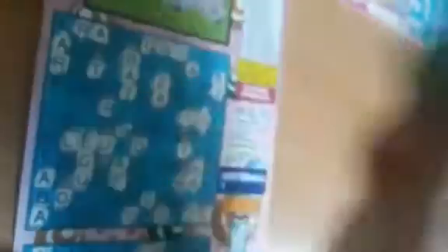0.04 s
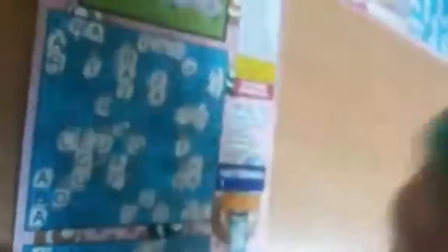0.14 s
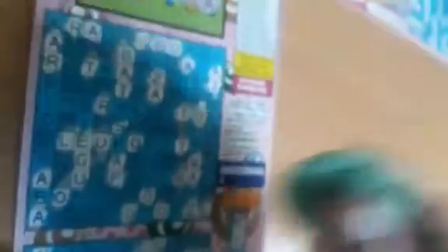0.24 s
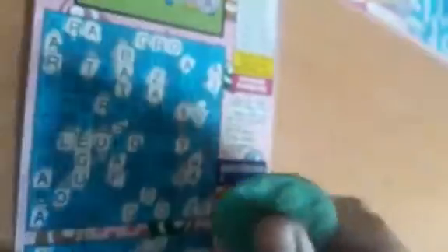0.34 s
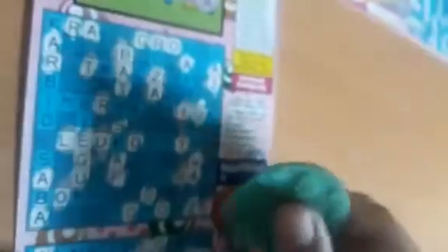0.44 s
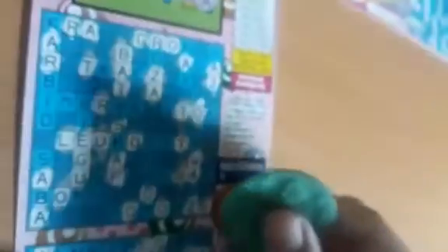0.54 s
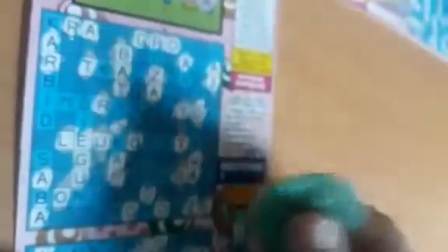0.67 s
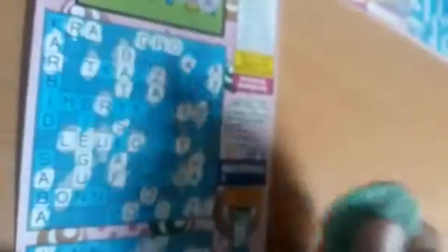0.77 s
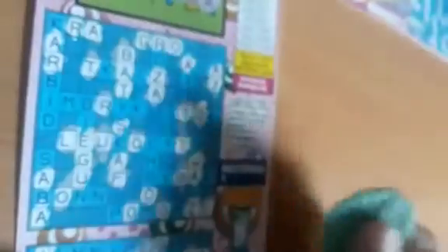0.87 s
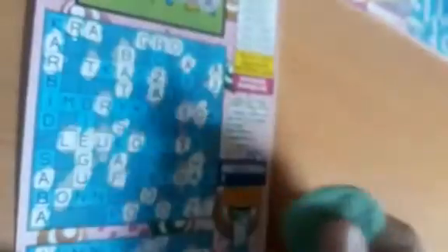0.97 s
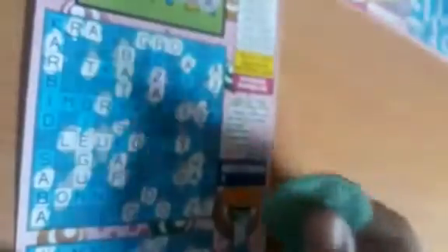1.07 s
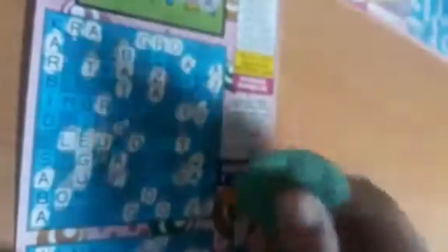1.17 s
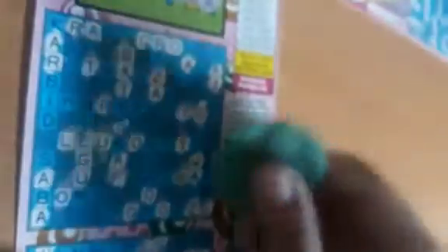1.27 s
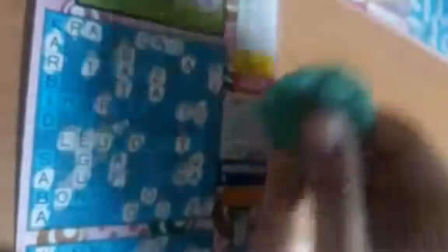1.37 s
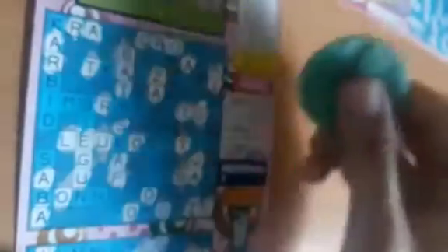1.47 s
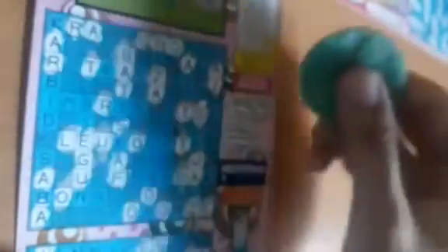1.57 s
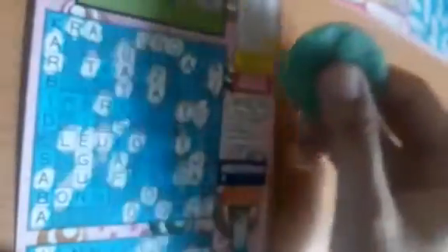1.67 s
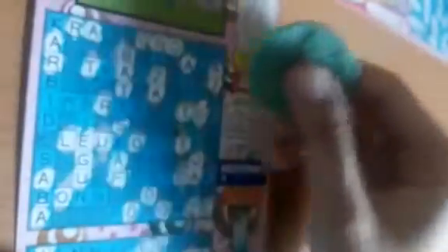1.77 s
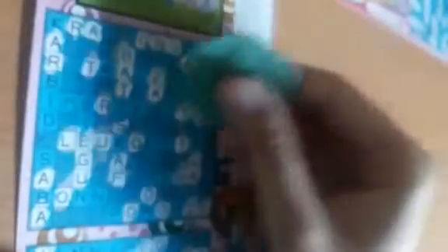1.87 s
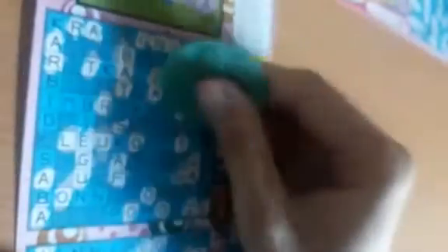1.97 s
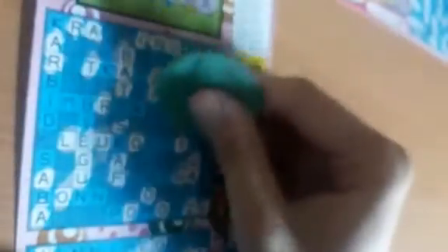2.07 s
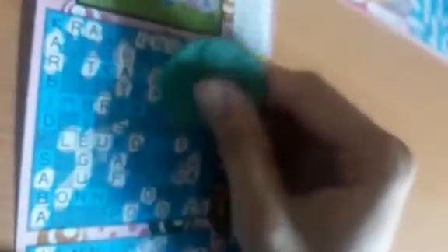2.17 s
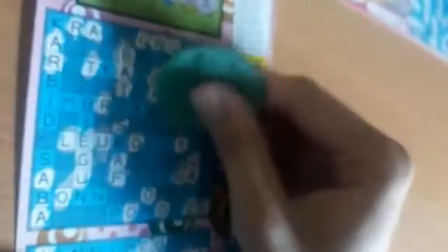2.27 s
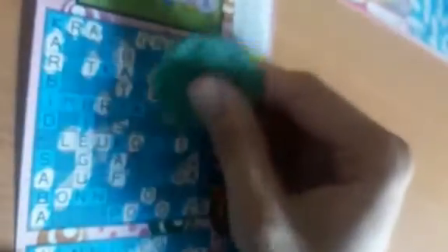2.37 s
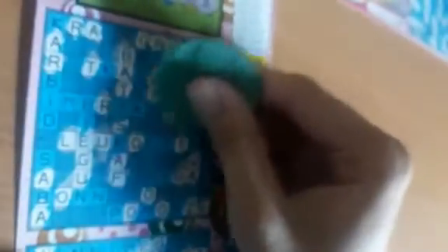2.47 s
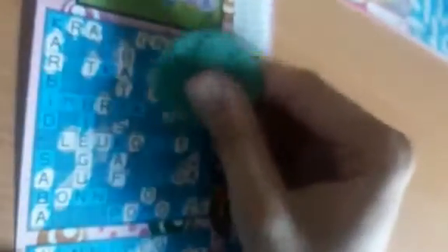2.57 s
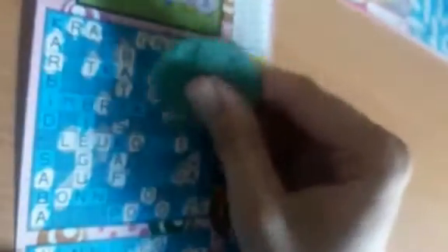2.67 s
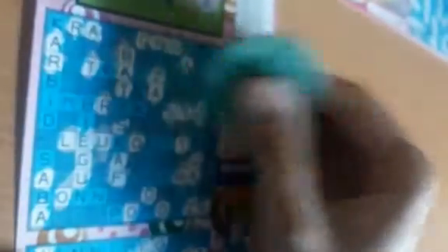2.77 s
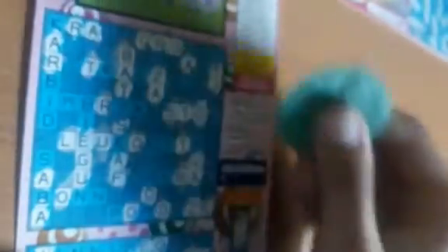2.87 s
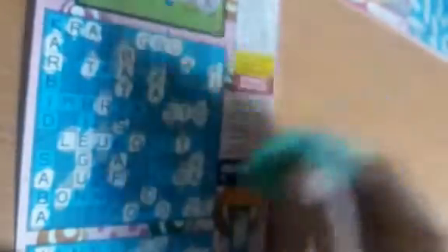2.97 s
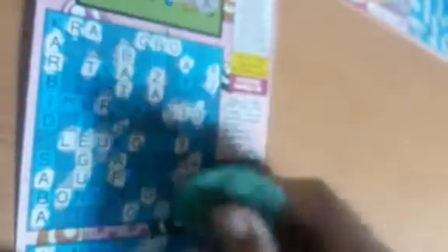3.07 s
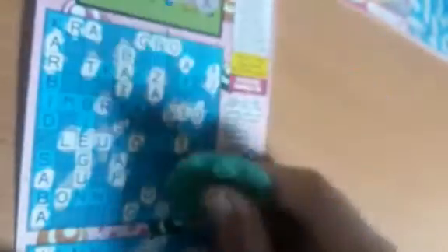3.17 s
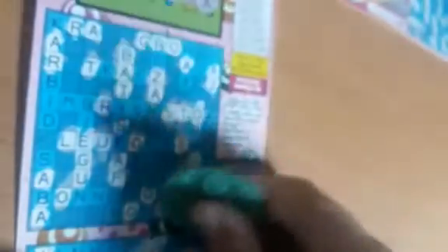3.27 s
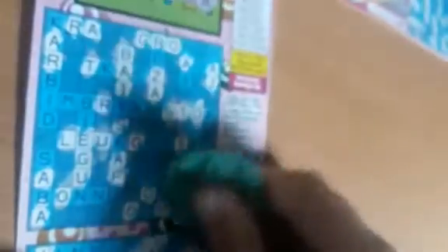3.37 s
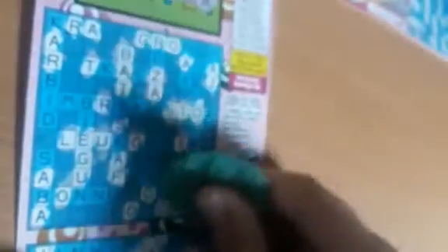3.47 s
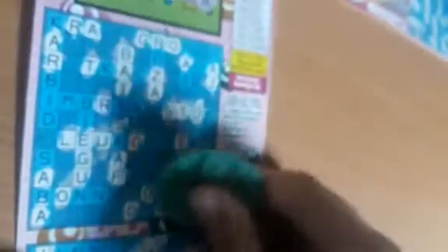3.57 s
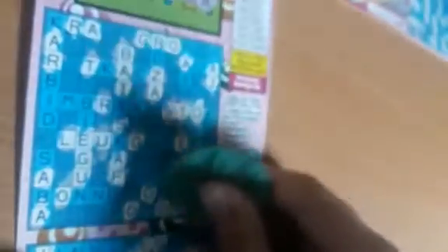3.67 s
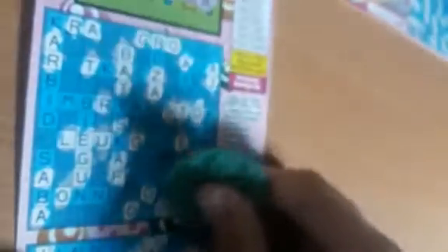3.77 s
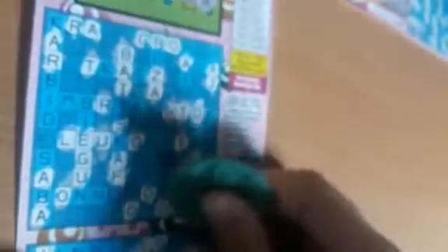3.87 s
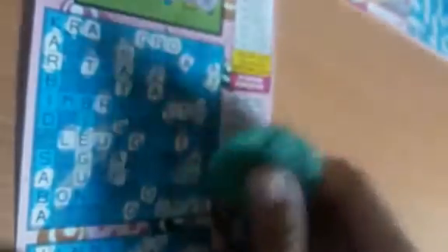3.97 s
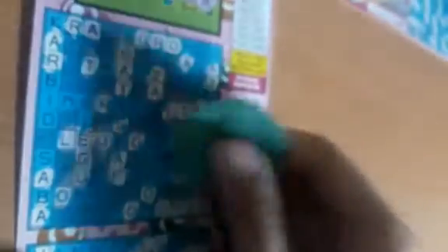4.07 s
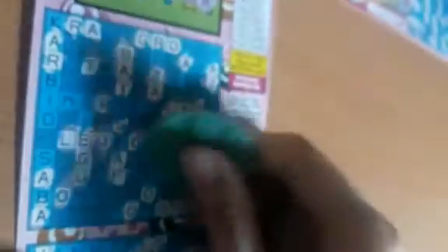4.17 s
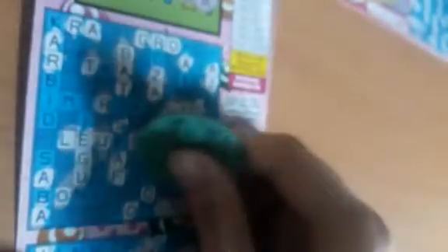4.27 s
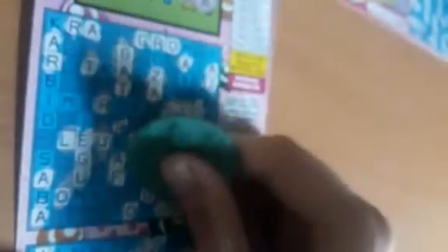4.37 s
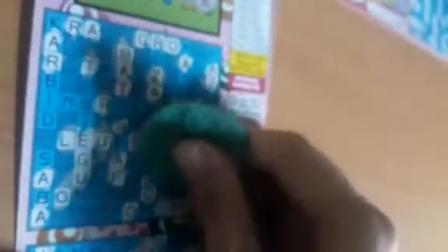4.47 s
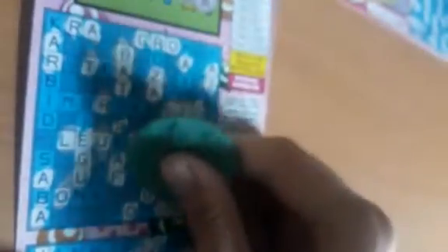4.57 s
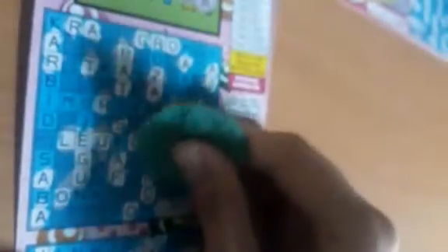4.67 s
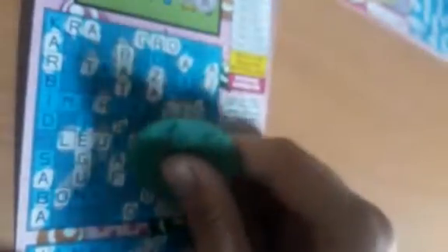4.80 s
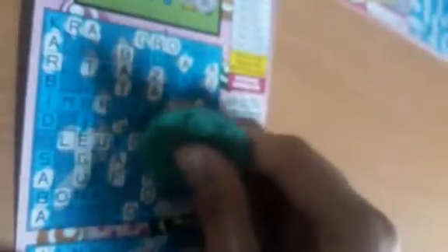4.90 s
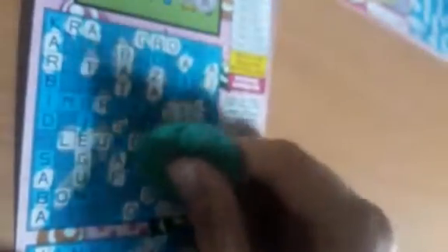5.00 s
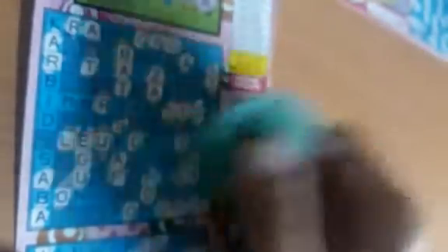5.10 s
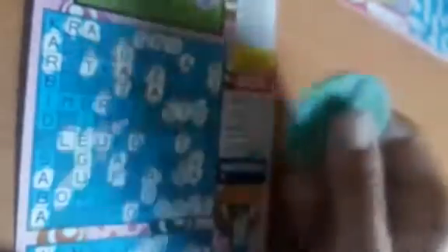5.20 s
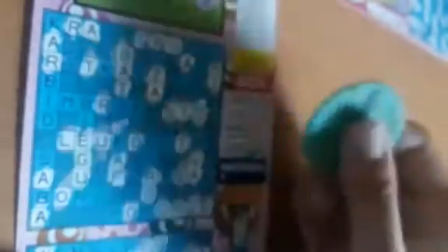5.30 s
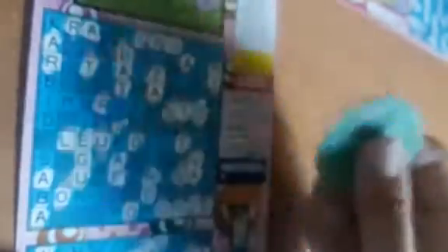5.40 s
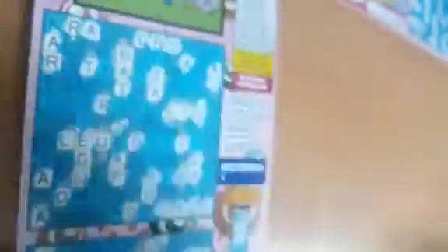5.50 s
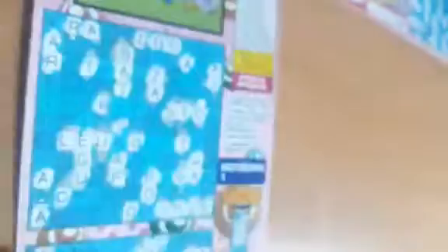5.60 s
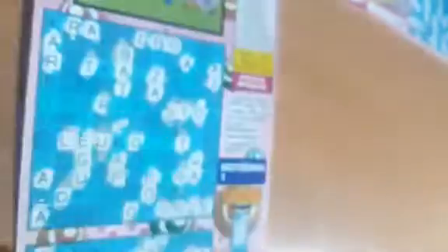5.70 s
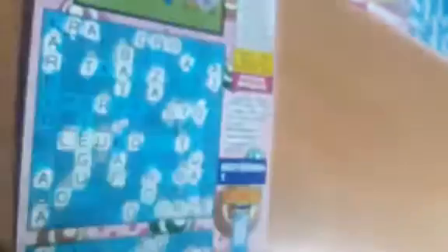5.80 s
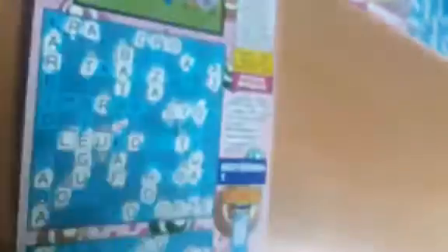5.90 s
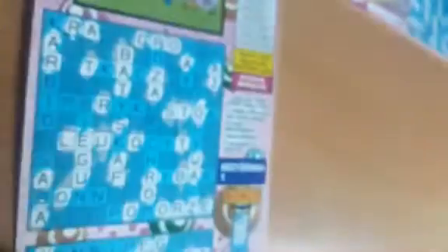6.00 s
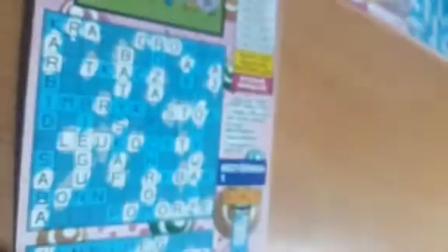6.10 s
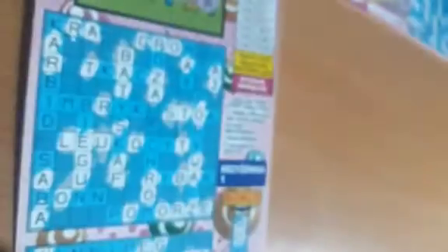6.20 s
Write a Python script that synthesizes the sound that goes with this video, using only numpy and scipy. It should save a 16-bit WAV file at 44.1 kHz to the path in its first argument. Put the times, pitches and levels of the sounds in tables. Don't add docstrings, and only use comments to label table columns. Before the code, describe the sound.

In a quiet room, close to the microphone, fingers shift softly on paper and a plastic scraper gives small sharp ticks. After two seconds it taps down and rubs a card on a wooden table with seven quick push-and-pull strokes. A pause with faint brushing, then two more bouts begin with firmer knocks, the tabletop thudding beneath the scratchy rasp. Finally the scraper lifts with a tiny dusty flick, and a few faint ticks end it.

```python
import sys
import numpy as np
from scipy import signal
from scipy.fft import rfft, irfft, next_fast_len
from scipy.io import wavfile
from scipy.ndimage import uniform_filter1d, map_coordinates

SR = 44100
rng = np.random.default_rng(int(sys.argv[2]) if len(sys.argv) > 2 else 0)


def gain_from_db(level_db):
    decades = np.asarray(level_db, float) / 20
    return 10 ** decades


def dump(signal):
    limited = np.clip(np.atleast_2d(signal).T, -1, 1)
    pcm = np.round(limited * 32767).astype(np.int16)
    wavfile.write(sys.argv[1], SR, pcm)


N = 275614
TIME = np.arange(N) / SR
SLOW = TIME[::16]

# [f/Hz, level/dB per Hz]
AIR_SPECTRUM = [(120, -27), (200, -6), (340, -10.5), (840, -9.5), (1600, -18), (4200, -18.5), (9500, -27),
                (14800, -19.5)]
# [f/Hz, level/dB per Hz]
TREMOR_SPECTRUM = [(15, -59), (25, -6), (41, -19), (59, -1.5), (177, -1), (210, -20), (270, -40),
                   (460, -120)]
# [middle t/s, length/s, level/dB]
LEANING = [
    (3.7, 2, 3.5),
    (2.3, 3.6, 1.5),
]
# [f/Hz, level/dB per Hz]
HISS_SPECTRUM = [(30, -8), (150, -16), (400, -20), (1500, -20.5), (5000, -13.5), (9000, -17.5),
                 (14000, -15), (15800, -18.5)]
# [f/Hz, t60/s]
ROOM_DECAY = [(200, 0.51), (2000, 0.24), (6000, 0.23), (12000, 0.51)]
# [t/s, peak level/dB, main f/Hz, second f/Hz]
TICKS = [(0, -41, 3990, 6160), (0, -43, 432, 800), (0, -51, 7230, 12000), (0.4897, -35, 5840, 5270),
         (.49, -46, 4280, 3820), (0.7468, -47.5, 6670, 4100), (0.7487, -60, 7700, 11700),
         (.9027, -44, 3790, 6350), (.9662, -46, 3500, 5850), (.968, -61, 2010, 1770),
         (.99, -61, 14300, 13700), (1.0816, -44.5, 6250, 14100), (1.081, -41.5, 1256, 1560),
         (1.0832, -52.5, 3900, 8150), (2.6185, -35.5, 3150, 2500), (2.619, -38.5, 6370, 14800),
         (3.337, -26.5, 2170, 1373), (5.026, -44.5, 6100, 4500), (5.078, -62, 6260, 8550),
         (5.126, -50.5, 5860, 8000), (5.126, -58, 15100, 14400), (6.117, -63, 3080, 1520),
         (6.121, -44, 5770, 4700), (6.126, -56.5, 2260, 7400)]
# [middle t/s, length/s, level/dB, cupped-hand f/Hz]
SLIDES = [(0, 0.018, -58.5, 3950), (0.134, 0.21, -73, 4870), (0.374, 0.094, -79, 4440),
          (0.557, 0.081, -74, 5900), (.79, 0.06, -77, 6000), (.92, 0.14, -74, 3700),
          (1.134, 0.079, -81, 6000), (1.213, 0.12, -76.5, 5370), (1.92, 0.14, -79.5, 3940),
          (2.872, 0.47, -81.5, 4800), (3.068, 0.062, -73.5, 4000), (4.027, 0.19, -79, 5100),
          (5.142, 0.064, -73, 5850), (5.36, 0.062, -86, 4400), (5.62, 0.13, -92.5, 4150),
          (6.155, .07, -82, 5840)]
# [middle t/s, length/s, level/dB, hollow f/Hz, hollow level/dB]
BRUSHES = [(0.172, 0.049, -75, 4800, 1), (0.158, 0.031, -78, 2600, 6), (5.175, 0.1, -81.5, 6000, -3),
           (1.848, 0.023, -77, 3900, 12), (1.887, 0.038, -79.5, 4000, 17), (1.89, 0.047, -75.5, 8300, 1),
           (2.98, 0.053, -65.5, 4400, 2.5), (3.02, 0.032, -80, 4300, 1), (3.064, 0.022, -72, 4000, 14),
           (3.073, 0.033, -86, 6200, 14), (4.118, 0.056, -80, 4000, 6), (4.196, 0.22, -82.5, 5800, 5),
           (6.162, 0.067, -84.5, 5000, 12)]
# [middle t/s, length/s, level/dB]
PRESSES = [(0, 0.04, -55.5), (0.108, 0.11, -72.5), (0.46, 0.33, -76), (0.865, 0.1, -74), (1.157, 0.1, -79),
           (2.995, 0.26, -69.5), (4.183, 0.13, -63.5), (5.047, 0.065, -59.5), (5.21, 0.17, -70.5)]
# [f/Hz, level/dB per Hz]
SKIN_SPECTRUM = [(880, -36), (1500, -19), (2640, -19), (3120, -15), (4440, -9.5), (6690, -12), (8790, -33),
                 (15500, -30.5)]
# [f/Hz, width/Hz, level/dB]
WOOD_MODES = [(211.7, 15, 2), (279.5, 11.6, -0.5), (421.3, 12, 5), (528.3, 16, -0.5), (629.2, 14.6, 1.5),
              (704.5, 33, 0.5), (727, 48, 1.5), (816, 124, -5.5), (994, 33, 0), (1154, 130, -20)]
# [t/s, peak level/dB]
BUMPS = [(0.146, -54.5), (1.925, -56), (2.685, -53), (2.948, -50.5), (3.076, -46), (3.213, -53),
         (3.34, -43), (3.519, -53), (4.139, -58), (4.258, -45), (4.565, -49), (4.768, -52), (5.006, -48.5),
         (6.152, -53.5)]
# [t/s, peak level/dB, f/Hz]
THUMPS = [(2.115, -37.5, 211), (2.294, -39.5, 199), (2.515, -41, 227), (2.694, -47, 263), (3.36, -49, 199),
          (3.565, -41.5, 223), (3.75, -38, 249.6), (3.913, -44, 216), (4.771, -43.5, 198),
          (4.972, -43.5, 203), (5.012, -36, 220.4), (6.154, -64, 292)]
# [t/s, peak level/dB, contact f/Hz, hardness level/dB, table ring level/dB]
TAPS = [
    (1.972, -29.5, 643, -22, 3.5),
    (3.216, -31.5, 636, -11, 9),
    (3.2229, -29.5, 420, -30, -7),
    (3.916, -40, 415, -25, 0),
    (4.259, -17.5, 658, -14, 1),
    (4.712, -38, 635, -23, -1),
    (4.846, -27.5, 446, -35, -11),
]
# [f/Hz, width/Hz, level/dB]
CARD_MODES = [(1155, 25, -8), (1287, 40, -7), (1417, 57, 3), (1690, 58, 0.5), (1905, 34, 2),
              (2257, 270, -4.5), (2366, 34, 0), (2650, 110, -5.5), (3124, 265, -5), (3510, 90, -4.5)]
# [f/Hz, width/Hz, level/dB]
RIM_MODES = [(3800, 420, 11.5), (4440, 220, 17.5), (5010, 39, 19), (5160, 99, 15.5), (5740, 460, 20.5),
             (6310, 160, 20), (6870, 254, 14)]
# [middle t/s, length/s, weight on table level/dB, rim speed level/dB]
STROKES = [(2.101, 0.038, -43.5, -52.5), (2.207, 0.036, -50.5, -50), (2.311, .036, -40.5, -55.5),
           (2.412, 0.036, -48, -48.5), (2.512, .033, -40.5, -57.5), (2.614, 0.026, -46, -49),
           (2.71, 0.038, -42.5, -61.5), (3.329, 0.046, -40.5, -47.5), (3.43, 0.039, -47.5, -44),
           (3.54, 0.035, -40.5, -55), (3.652, 0.034, -49.5, -51), (3.744, 0.028, -40.5, -58),
           (3.837, 0.025, -49.5, -59.5), (3.913, 0.05, -55.5, -64.5), (4.362, 0.038, -43, -53),
           (4.484, 0.03, -51.5, -48), (4.584, 0.034, -40.5, -54), (4.696, 0.035, -54, -55),
           (4.787, 0.038, -42, -56.5), (4.9, 0.04, -55.5, -59.5), (4.996, 0.046, -41.5, -56)]
# [t/s, length/s, extra level/dB]
BITES = [(2.19, .01, 0), (2.614, .014, 3), (2.701, 0.02, 5), (3.333, 0.013, 4), (3.403, 0.015, 9.5),
         (3.448, 0.011, 0), (3.565, .006, 5), (3.665, 0.0079, 8), (3.915, .01, 4.5), (4.356, 0.0028, 2.5),
         (4.473, 0.013, -5.5), (4.493, 0.0088, 4), (4.602, 0.016, 3.5), (4.709, .008, 2), (4.8, 0.013, 6.5),
         (5.027, 0.024, 4)]
# [f/Hz, level/dB per Hz]
DUST_SPECTRUM = [(6000, -39), (8000, -3), (9800, -5.5), (11000, -2), (12500, 0), (14500, 1), (15800, 9)]
# [middle t/s, length/s, level/dB]
FLICKS = [
    (5.16, 0.039, -67),
]

AIR_DB, TREMOR_DB = -73, -72.5
TOP_HZ = 15770
SHIFT_S = .11
SECOND_DB, SECOND_DB_PER_OCTAVE = -3.5, -8.5
TICK_T60_S, TICK_SHORTENS = 0.024, 0.36
RESTING_SKIN_DB, RESTING_WOOD_DB = -86.5, -85
BUMP_HZ, BUMP_SCATTER = 103.6, 0.037
CRACK_DB, SOFT_TAP_HZ, SOFT_PALM_HZ = -15.5, 800, 481
USUAL_WEIGHT_DB, USUAL_SPEED_DB = -46, -53
CARD_DB, CARD_PER_WEIGHT, CARD_PER_SPEED, CARD_WEARS_DB_PER_S = -51.5, 1.11, 0.19, 1.17
DUST_DB, DUST_PER_WEIGHT, DUST_PER_SPEED, DUST_WEARS_DB_PER_S = -63, -0.2, 1.74, 3.5


def unit(x):
    return x / np.sqrt(np.mean(np.abs(x) ** 2) + 1e-20)


def along(points, hz):
    f, v = np.transpose(points)
    return np.interp(np.log(hz + 1), np.log(f + 1), v)


def filtered(x, response):
    m = next_fast_len(N + SR // 2)
    gain = unit(response(np.fft.rfftfreq(m, 1 / SR)))
    return irfft(rfft(x, m) * gain, m)[..., :N]


def shaped(spectrum):
    return lambda f: gain_from_db(along(spectrum, f))


def resonances(peaks, low_hz=0):
    def response(f):
        total = 0
        for k, (hz, width, db) in enumerate(peaks):
            total = total + (-1) ** k * gain_from_db(db) * 1j * f * width / (hz * hz - f * f + 1j * f * width)
        return (1j * f / (low_hz + 1j * f + 1e-9)) ** 2 * total
    return response


def noise(spectrum):
    return filtered(rng.standard_normal(N), shaped(spectrum))


def wobble(rate):
    return map_coordinates(rng.standard_normal(int(N * rate / SR) + 4), [TIME * rate])


def smoothed(x, size):
    return uniform_filter1d(uniform_filter1d(x, size=size), size=size)


def catches(rate, spread_db, smooth):
    draw = rng.random((3, N))
    size = gain_from_db(-spread_db * np.log(draw[1] + .02))
    pulses = size * np.sign(draw[2] - .5) * (draw[0] < rate / SR)
    share = np.clip(smooth, 0, 1)
    return np.sqrt(1 - share) * unit(pulses) + np.sqrt(share) * rng.standard_normal(N)


def ring(hz, t60, t, attack):
    return np.sin(2 * np.pi * hz * t) * gain_from_db(-60 * t / t60) * (1 - np.exp(-t / attack))


def add(track, s, sound):
    piece = track[round(s * SR):][:len(sound)]
    piece += sound[:len(piece)]


def hump(middle, length, lean):
    u = (SLOW - middle) / length - 0.65 * lean
    return np.exp(-3.2 * np.abs(u * np.where(u > 0, 1 + lean, 1 - lean)) ** 3)


def per_sample(curve):
    return np.interp(TIME, SLOW, curve)


def room_tone():
    hum = np.sin(2 * np.pi * 491 * TIME) * (1 + .25 * wobble(25))
    lean_db = sum(db * hump(middle, length, lean=0) for middle, length, db in LEANING)
    tremor = gain_from_db(TREMOR_DB + per_sample(lean_db)) * noise(TREMOR_SPECTRUM)
    air = gain_from_db(AIR_DB + 1.3 * wobble(2.6)) * noise(AIR_SPECTRUM)
    return air + gain_from_db(-76.5) * hum + tremor


def room(x):
    hz, t, z = signal.stft(rng.standard_normal((4, SR // 2)), SR, nperseg=256)
    decay = gain_from_db(-60 * t / along(ROOM_DECAY, hz)[:, None])
    tails = signal.istft(z * decay, SR, nperseg=256)[1]
    tails = tails / np.linalg.norm(tails[0])
    turn = (TIME / SHIFT_S - np.arange(4)[:, None]) % 4
    parts = x * np.clip(1 - np.abs(turn - 2), 0, 1)
    delayed = np.pad(parts, ((0, 0), (150, 0)))
    return signal.oaconvolve(delayed, tails, axes=1).sum(axis=0)[:N]


def ticks():
    out, t = np.zeros(N), np.arange(SR // 10) / SR
    for s, db, hz, second_hz in TICKS:
        second_db = min(SECOND_DB + SECOND_DB_PER_OCTAVE * np.log2(second_hz / hz), 3)
        t60 = TICK_T60_S * (4000 / hz) ** TICK_SHORTENS
        flutter = unit(smoothed(rng.standard_normal((2, len(t))), 24))
        rough = 1 + flutter * np.array([[hz], [second_hz]]) / 5000
        spike = hz / 6000 * ring(hz, 0.0066, t, .0001)
        spike = spike + 0.042 * gain_from_db(-60 * t / 0.0019) * rng.standard_normal(len(t))
        main = rough[0] * ring(hz, t60, t, 1.4 / hz)
        second = gain_from_db(second_db) * rough[1] * ring(second_hz, t60, t, 3.1 / second_hz)
        add(out, s, gain_from_db(db) * (spike + 0.49 * (main + second)))
    return out


def slide():
    flutter = unit(wobble(350))
    skin = filtered(catches(rate=5000, spread_db=1.5, smooth=.8), shaped(SKIN_SPECTRUM))
    modes = resonances([(hz, width + 25, db) for hz, width, db in WOOD_MODES])
    soft = lambda f: 1j * f / (SOFT_PALM_HZ ** 2 - f * f + 1j * f * 300)
    wood = filtered(rng.standard_normal(N), lambda f: modes(f) * soft(f))

    def touch(middle, length, db, hz, hollow_db):
        hollow = flutter * np.sin(2 * np.pi * hz * TIME)
        return gain_from_db(db) * per_sample(hump(middle, length, lean=0)) * (skin + gain_from_db(hollow_db) * hollow)

    grips = gain_from_db(RESTING_SKIN_DB) * skin + sum(touch(*row, hollow_db=-6.0) for row in SLIDES)
    presses = sum(gain_from_db(db) * hump(middle, length, lean=0) for middle, length, db in PRESSES)
    palm = per_sample(gain_from_db(RESTING_WOOD_DB) + presses)
    return gain_from_db(1.04 * wobble(40)) * grips + palm * wood + sum(touch(*row) for row in BRUSHES)


def bumps():
    out, t = np.zeros(N), np.arange(SR // 3) / SR
    for s, db in BUMPS:
        hz = BUMP_HZ * (1 + BUMP_SCATTER * rng.standard_normal())
        add(out, s, gain_from_db(db + 5.5) * ring(hz, 0.15, t, 0.011))
    for s, db, hz in THUMPS:
        add(out, s, gain_from_db(db + 2.0) * ring(hz, 0.12, t, 0.0067))
    return out


def rim(f):
    return resonances(RIM_MODES, low_hz=2500)(f) / (1 + 1j * f / 7300) ** 2 / (1 + (f / 7400) ** 12) ** .5


def taps():
    thud, t = np.zeros(N), np.arange(SR // 5) / SR
    table, card, crack = np.zeros((3, N))
    for s, db, hz, card_db, ring_db in TAPS:
        grain = rng.standard_normal((3, len(t)))
        shiver = 1 + 0.68 * unit(smoothed(grain[0], 60))
        body = ring(hz, 0.032, t, 0.0013) + 0.083 * shiver * ring(1.3 * hz, 0.14, t, 0.00093)
        card_decay = gain_from_db(-60 * t / 0.0094) + 0.16 * gain_from_db(-60 * t / 0.14)
        rim_decay = gain_from_db(-60 * t / 0.02) + 0.18 * gain_from_db(-60 * t / 0.21)
        add(thud, s, gain_from_db(db) * body)
        add(table, s, gain_from_db(db + ring_db - 10.5) * np.hanning(30))
        add(card, s, gain_from_db(db + card_db) * grain[1] * card_decay)
        add(crack, s, gain_from_db(db + card_db + CRACK_DB) * grain[2] * rim_decay)
    blunt = lambda f: resonances(WOOD_MODES, low_hz=250)(f) / (1 + 1j * f / SOFT_TAP_HZ) ** 2
    dull = lambda f: resonances(CARD_MODES, low_hz=900)(f) / (1 + 1j * f / 2000) ** 4
    return thud + filtered(table, blunt) + filtered(card, dull) + filtered(crack, rim)


def stroke_levels(middle, weight_db, speed_db):
    weight, speed = weight_db - USUAL_WEIGHT_DB, speed_db - USUAL_SPEED_DB
    worn_s = middle - STROKES[0][0]
    card_db = CARD_DB + CARD_PER_WEIGHT * weight + CARD_PER_SPEED * speed - CARD_WEARS_DB_PER_S * worn_s
    dust_db = DUST_DB + DUST_PER_WEIGHT * weight + DUST_PER_SPEED * speed - DUST_WEARS_DB_PER_S * worn_s
    return weight_db, card_db, speed_db, dust_db


def patchy(x, depth_db):
    z = signal.stft(x, nperseg=256)[2]
    field = uniform_filter1d(rng.standard_normal(z.shape), size=4, axis=0)
    field = uniform_filter1d(field, size=6, axis=1)
    return signal.istft(z * gain_from_db(depth_db * unit(field)), nperseg=256)[1][:N]


def strokes():
    force, bright = np.zeros((4, len(SLOW))), np.zeros(len(SLOW))
    for middle, length, weight_db, speed_db in STROKES:
        levels_db = stroke_levels(middle, weight_db, speed_db)
        speed = hump(middle, length, lean=0.22)
        force += gain_from_db(levels_db)[:, None] * speed ** np.array([[1], [1], [1], [2.2]])
        card_over_rim_db = levels_db[1] - levels_db[2]
        bright = np.where(speed > .001, 1 / (1 + gain_from_db(card_over_rim_db + 5.0)), bright)
    force[3] += sum(gain_from_db(db) * hump(middle, length, lean=-.2) for middle, length, db in FLICKS)
    bite_db = sum(db * np.exp(-((SLOW - s) / length) ** 2 * 2) for s, length, db in BITES)
    bright = per_sample(bright)
    grain = gain_from_db(1.4 * wobble(110) + 1.4 * wobble(400))
    force = np.array([per_sample(row) for row in force * gain_from_db(bite_db)]) * grain
    coarse = catches(rate=700, spread_db=3, smooth=.5)
    fine = catches(rate=2200, spread_db=3, smooth=.4)

    pressed = [(hz, width + 14, db) for hz, width, db in WOOD_MODES]
    table = filtered(force[0] * coarse, resonances(pressed, low_hz=106)) * gain_from_db(-3.0)
    leg_modes = resonances([(107.6, 20, 1), (66, 36, -25.5)])
    legs = filtered(force[0] * rng.standard_normal(N), leg_modes) * gain_from_db(-20.5)

    drive = force[1] * (coarse + 0.48 * fine) * gain_from_db(-4.0)
    dull = lambda f: resonances(CARD_MODES, low_hz=900)(f) / (1 + 1j * f / 2500)
    heavy = filtered(drive * np.sqrt(1 - bright), dull)
    light = filtered(drive * np.sqrt(bright), resonances(CARD_MODES, low_hz=2600))
    grit = filtered(force[2] * fine, rim)
    specks = catches(rate=4000, spread_db=2.5, smooth=.7)
    dust = filtered(force[3] * specks, shaped(DUST_SPECTRUM))
    return table + legs + patchy(heavy + light + grit + dust, depth_db=2.3)


def scene():
    clicks = ticks()
    rubbing = strokes() + taps()
    echoes = gain_from_db(-9) * room(rubbing) + gain_from_db(-5.5) * room(clicks)
    mid = rubbing + clicks + echoes + bumps() + slide() + room_tone()
    side = gain_from_db(-79) * noise(HISS_SPECTRUM) + gain_from_db(-45.0) * room(mid)
    return np.array([mid + side, mid - side])


def roll_off(x):
    return signal.sosfilt(signal.butter(12, 16650, fs=SR, output="sos"), x)


def record(dry):
    level = np.sqrt(2 * TOP_HZ / SR)
    mix = filtered(dry, lambda f: 1. * (f < TOP_HZ)) * level
    return roll_off(mix)


dry = scene()
out = record(dry)
dump(out)
```